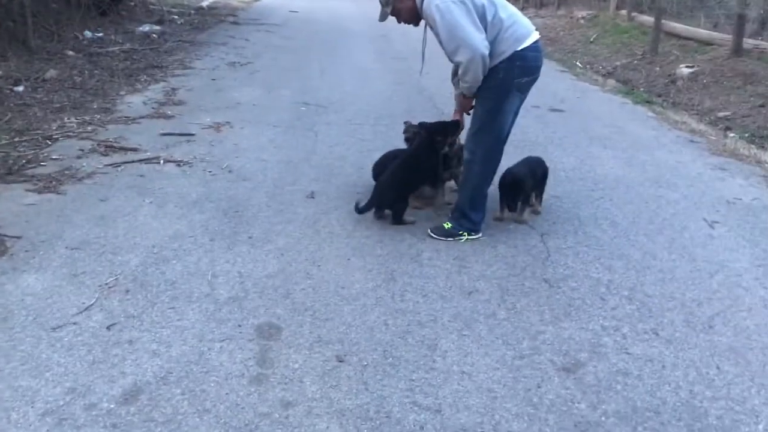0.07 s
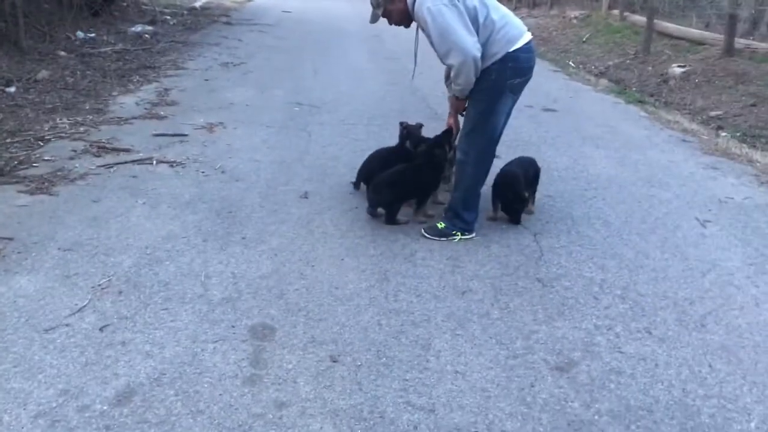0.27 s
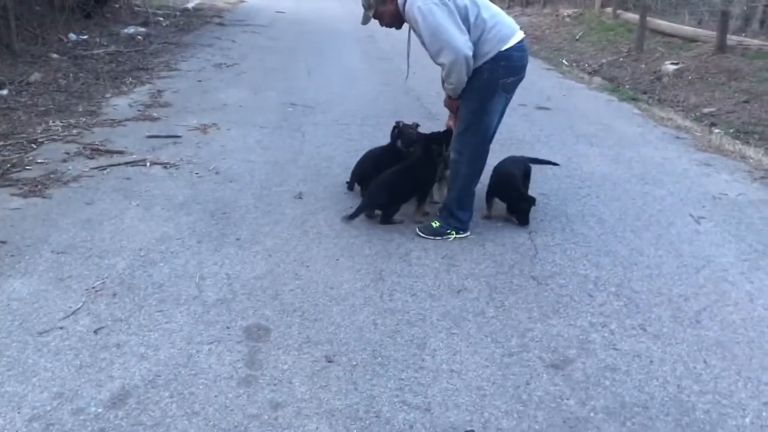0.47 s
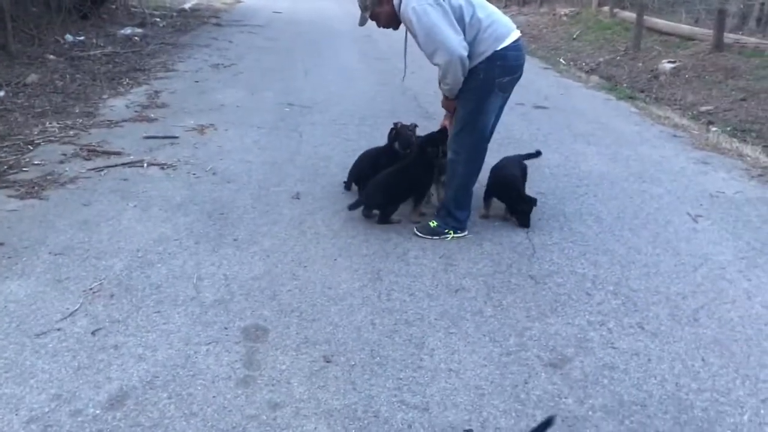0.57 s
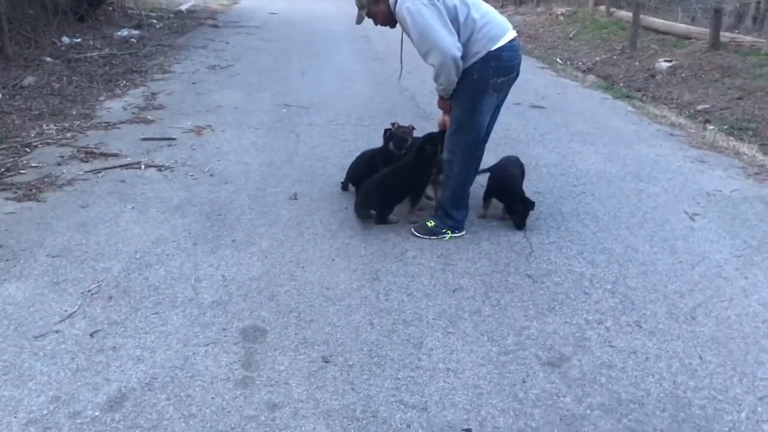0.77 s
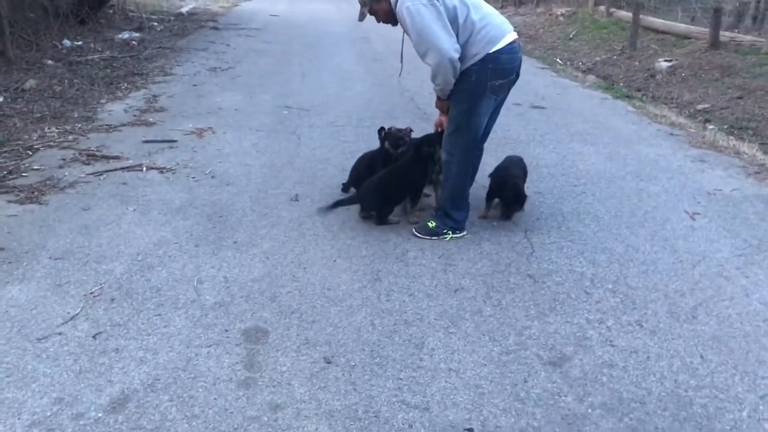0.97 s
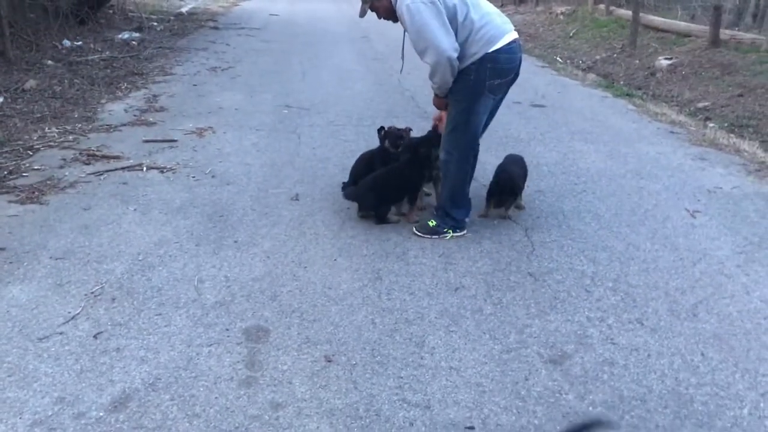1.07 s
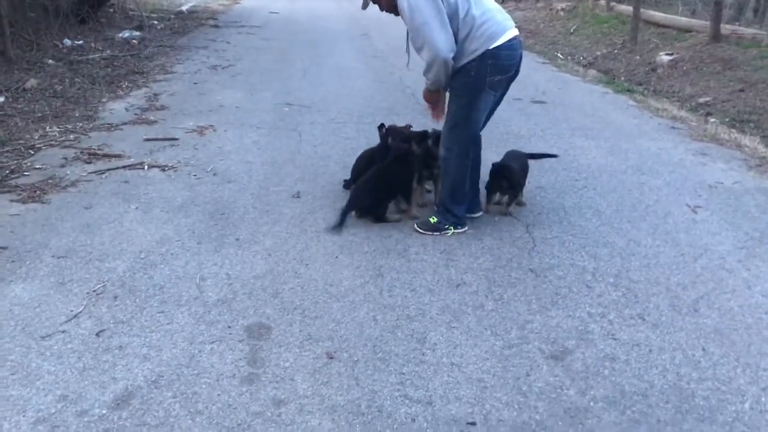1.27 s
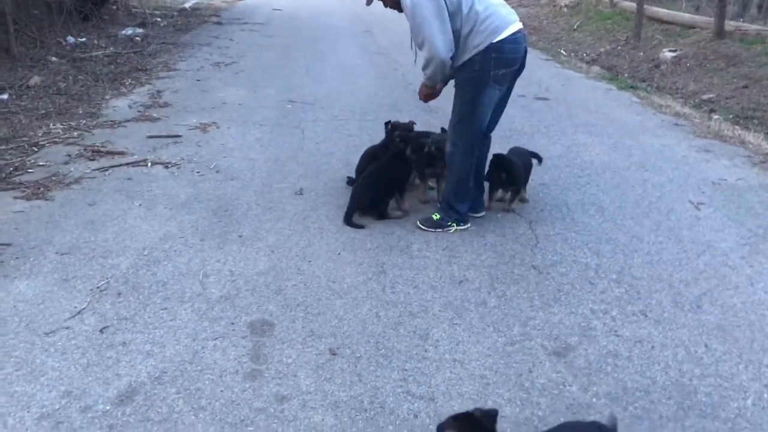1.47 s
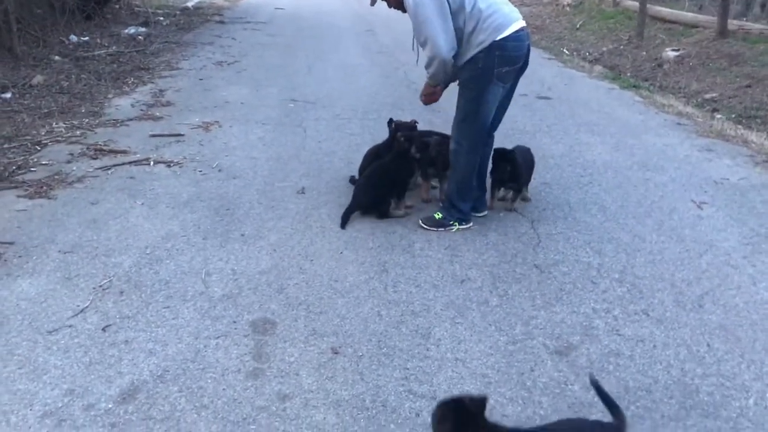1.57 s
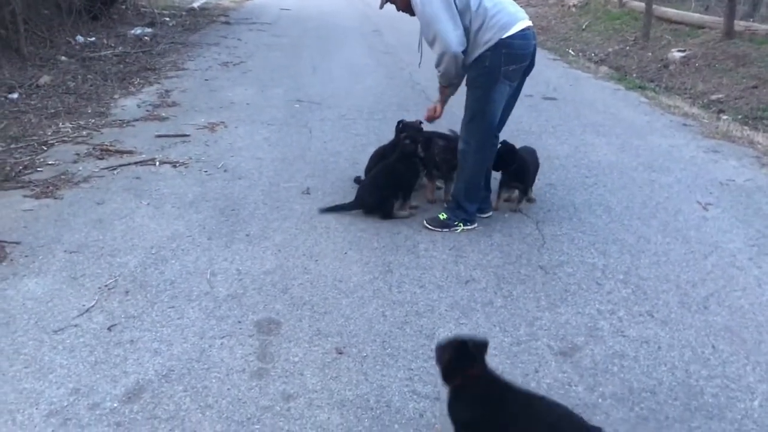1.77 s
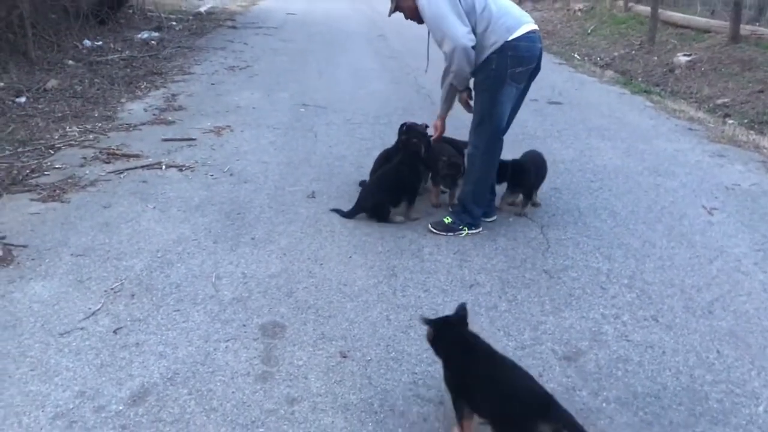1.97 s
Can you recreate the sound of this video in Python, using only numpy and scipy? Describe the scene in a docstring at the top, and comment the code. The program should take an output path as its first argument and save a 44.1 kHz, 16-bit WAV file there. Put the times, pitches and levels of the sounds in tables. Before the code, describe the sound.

Short, high puppy calls come one after another on a country road: a yelp, two hoarse yips, then three cleaner ones. Each echoes slightly, while faint claw ticks and soft open-air hiss lie underneath.

```python
"""A puppy's whining yelp comes first, then five short begging yips that rise and fall in pitch.
Each call is the buzz of the vocal folds, shaped by the throat and mouth. The yelp and the first two
yips break into a rasp, and air rushes through those two yips, most strongly the second.
Claws tick on the asphalt of a country road, the roadside bank and trees send back a dull echo,
and a faint outdoor rumble and hiss lie under it all."""
import sys
import numpy as np
from scipy import signal
from scipy.fft import rfft, irfft, next_fast_len
from scipy.io import wavfile
from scipy.ndimage import uniform_filter1d

SR = 44100
rng = np.random.default_rng(int(sys.argv[2]) if len(sys.argv) > 2 else 0)


def to_wav(sig):
    """Store sig (one row per channel, or 1-D mono) as 16-bit WAV at the path in sys.argv[1].

    Samples outside -1..1 are clipped; the rate is SR.
    """
    pcm = np.clip(np.atleast_2d(sig), -1, 1) * 32767
    pcm = np.round(pcm).astype(np.int16)
    wavfile.write(sys.argv[1], SR, pcm.T)  # frames by channels


N = 88993
TIME = np.arange(N) / SR


def from_db(db):
    """Turn decibels into a gain to multiply by."""
    return 10 ** (np.asarray(db) / 20)


def rms_one(x):
    """Scale a signal so that its average strength (rms) is 1."""
    return x / np.sqrt(np.mean(x ** 2) + 1e-20)


def gain_at(spectrum, hz):
    """Look up the gain at these frequencies in a table of f/Hz, level/dB."""
    table_hz, db = np.transpose(spectrum)
    return from_db(np.interp(np.log(np.maximum(hz, 1)), np.log(table_hz), db))


def colour(x, spectrum):
    """Turn each frequency of a sound up or down as the table says."""
    size = next_fast_len(2 * len(x))
    gains = gain_at(spectrum, np.fft.rfftfreq(size, 1 / SR))
    return irfft(rfft(x, size) * gains, size)[:len(x)]


def noise(spectrum):
    """Noise of strength 1, coloured by the table."""
    return rms_one(colour(rng.standard_normal(N), spectrum))


def drift(hz):
    """A random wobble of strength 1, mostly slower than this rate."""
    lowpass = signal.butter(2, hz, fs=SR, output="sos")
    return rms_one(signal.sosfilt(lowpass, rng.standard_normal(2 * N))[N:])


def resonate(x, hz, width_hz):
    """Make a sound ring at one frequency; a narrower width rings longer."""
    r = np.exp(-np.pi * width_hz / SR)
    feedback = [1, -2 * r * np.cos(2 * np.pi * hz / SR), r * r]
    return signal.lfilter(np.array([1, 0, -1]) * (1 - r * r) / 2, feedback, x + 1e-18)


def delayed(x, seconds):
    """The same sound, later."""
    return np.interp(TIME - seconds, TIME, x, left=0)


def swell(peak_s, rise_s, hold_s, fall_s, db):
    """A gain that climbs 20 dB per rise time, holds from peak_s, then drops 20 dB per fall time."""
    rises_to_go = np.maximum(peak_s - TIME, 0) / rise_s
    falls_done = np.maximum(TIME - peak_s - hold_s, 0) / fall_s
    return from_db(db - 20 * (rises_to_go + falls_done))


def glide(rows):
    """Pitch and gain sliding through rows of t/s, f/Hz, level/dB; silent before and after."""
    times, hz, db = np.transpose(rows)
    sounding = (TIME >= times[0]) & (TIME < times[-1])
    return np.interp(TIME, times, hz), from_db(np.interp(TIME, times, db)) * sounding


def open_air(level_db=-46):
    """The steady, faint rumble and hiss of the outdoors."""
    # colour of the background: f/Hz, relative level/dB
    spectrum = [(22, -23), (45, -2.5), (62, -1.5), (100, -5), (160, -7), (260, -16.5), (420, -15),
                (850, -13), (1400, -17.5), (2000, -23), (3000, -35.5), (5000, -45), (8000, -51),
                (10500, -54.5), (15000, -43.5)]
    return from_db(level_db) * noise(spectrum)


def roadside_echo(x, bank_delay_s=0.064, build_s=0.025, fade_60db_s=0.85):
    """The bank sends back one echo; the trees scatter many small ones that die away."""
    # how bank and trees colour what they send back: f/Hz, gain/dB
    echo_colour = [(250, 12), (470, -12.5), (700, -1), (930, 7.5), (1400, 2.5), (1750, 8), (2600, -1),
                   (4500, -0.5), (7000, -3), (14000, -43)]
    scatter = rng.standard_normal(N) * from_db(-60 * TIME / fade_60db_s)
    scatter *= 1 - np.exp(-TIME / build_s)
    trees = signal.fftconvolve(x, scatter / np.sqrt(np.sum(scatter ** 2)))[:N]
    bank = delayed(x, bank_delay_s)
    return colour(from_db(-12.5) * trees + from_db(-15) * bank, echo_colour)


def claws(decay_s=0.0028, grit_per_s=67, grit_db=-62.5, grit_spread_db=8.5, grit_hz=13800):
    """Claws scratch the asphalt and grit crunches under the paws: tiny ringing bursts of noise."""
    # ticks on the asphalt: t/s, level/dB, ring f/Hz
    ticks = [(.223, -46, 13700), (0.249, -55.5, 13300), (0.356, -54.5, 13500), (0.422, -51, 4100),
             (.424, -59, 12100), (0.94, -57, 11600), (0.962, -54.5, 5160), (1.716, -57.5, 4040)]
    draws = rng.random((int(grit_per_s * N / SR), 2))
    grit = [(when * N / SR, grit_db - grit_spread_db * softness, grit_hz) for when, softness in draws]
    scratch, out = rng.standard_normal(N), np.zeros(N)
    for start_s, db, hz in ticks + grit:
        start = int(start_s * SR)
        burst = scratch[start:start + 1500]
        fade = np.exp(-TIME[:len(burst)] / decay_s)
        width_hz = 0.24 * hz
        ring = resonate(burst * fade, hz, width_hz)
        boost = np.sqrt(SR / (np.pi * width_hz))  # a narrow ring lets less noise through
        out[start:start + len(burst)] += from_db(db) * ring * boost
    return out


def air_rushes(bounce_s=0.0036, bounce_gain=0.92):
    """The hiss of a hoarse yip; its bounce off the road cancels evenly spaced frequencies."""
    # rushes of air through the mouth: peak t/s, rise/s, hold/s, fall/s, level/dB
    rushes = [(.315, .06, 0.024, 0.1, -64), (.635, 0.062, 0.11, 0.066, -48)]
    # colour of the rushing air: f/Hz, relative level/dB
    spectrum = [(800, -22), (1700, -3.5), (2600, -7.5), (3600, -7.5), (4500, -3.5), (6000, -10.5),
                (7600, -18.5), (10500, -14.5), (13000, -13), (14500, -7), (16000, -18)]
    air = noise(spectrum)
    gain = sum(swell(*rush) for rush in rushes)
    return gain * rms_one(air + bounce_gain * delayed(air, bounce_s))


def rasps():
    """The voice breaks: the vocal folds flutter chaotically and make the throat ring."""
    # each rasp: peak t/s, rise/s, hold/s, fall/s, level/dB, gain of the upper rings/dB
    breaks = [(0.032, 0.037, 0.027, 0.095, -38.5, 10), (0.273, 0.072, 0.039, 0.085, -31, -0.5),
              (0.66, 0.049, 0.051, .05, -30, 0.5)]
    # where the rasping throat rings: f/Hz, width/Hz, relative level/dB
    throat = [(525, 32.6, 5), (704, 154, -6), (1000, 330, -14.5), (1354, 146, -11), (1652, 69, -10),
              (2460, 280, -26), (4250, 510, -34.5)]
    flutter_band = signal.butter(2, [400, 6000], "band", fs=SR, output="sos")
    flutter = signal.sosfilt(flutter_band, rng.standard_normal(N))
    # alternating signs keep neighbouring rings from cancelling in the gap between them
    rings = [(-1) ** k * from_db(db) * resonate(flutter, hz, width_hz)
             for k, (hz, width_hz, db) in enumerate(throat)]
    out = np.zeros(N)
    for *shape, upper_db in breaks:
        rasp = sum(rings[:2]) + from_db(upper_db) * sum(rings[2:])
        strength = np.sqrt(uniform_filter1d(rasp * rasp, size=600) + 1e-12)
        out += swell(*shape) * rasp / strength  # evened out, so the swell sets the level
    return out


def voice(pitch, throat, roughness, overtone_gain):
    """The vocal folds buzz and the throat shapes the harmonics; roughness shakes pitch and level."""
    pitch_shake = 1 + 0.0928 * roughness * drift(hz=106.3)
    level_shake = 1 + 0.94 * roughness * drift(hz=126)
    phase = 2 * np.pi * np.cumsum(pitch * pitch_shake) / SR
    harmonics = [gain_at(throat, k * pitch) * np.sin(k * phase) for k in range(1, 21)]
    return (harmonics[0] + overtone_gain * sum(harmonics[1:])) * level_shake


def yelp():
    """A whine that rings on its second harmonic; a thin squeal splits off as it breaks."""
    # path of the whine: t/s, pitch f/Hz, level before the throat/dB
    whine_path = [(0, 411.7, -30.5), (0.017, 440.5, -28.5), (0.037, 465.5, -27), (0.049, 454.3, -40),
                  (0.064, 435, -39), (0.088, 393, -42), (.12, 404, -69)]
    # the throat with the mouth more open than in a yip: f/Hz, gain/dB
    throat = [(400, -22.5), (600, -12), (880, 1.5), (1340, -13.5), (1780, -7.5), (2250, -20.5),
              (2750, -23.5), (3600, -43), (4400, -24.5), (5300, -56), (6300, -34), (7300, -70)]
    # path of the squeal: t/s, pitch f/Hz, level/dB
    squeal_path = [(.025, 954, -67.5), (.04, 994, -33.5), (.06, 1083, -36), (.08, 1120, -66)]
    pitch, gain = glide(whine_path)
    whine = gain * voice(pitch, throat, roughness=0.12, overtone_gain=0.9)
    squeal_pitch, squeal_gain = glide(squeal_path)
    squeal = squeal_gain * np.sin(2 * np.pi * np.cumsum(squeal_pitch) / SR)
    return whine + squeal


def yips():
    """Five breathy yips share one arch of pitch and effort; the closing mouth dulls each at its end."""
    # each yip: start t/s, length/s, top pitch f/Hz, base level/dB, roughness/0-1, overtone gain/dB
    calls = [(0.164, .205, 476, -32, .12, 2), (.585, 0.18, 515, -37, 0.61, -2),
             (1.071, 0.16, 468, -30.5, 0.13, -2), (1.359, .167, 470, -31, 0.11, -0.5),
             (1.809, 0.18, 473, -31, .08, 1.5)]
    # the arch: share of the length, share of the top pitch, added level/dB, added overtone gain/dB
    arch = [(0, .53, -30, 2), (0.149, .6, -20.5, 0.5), (0.251, .68, -8, 0), (.35, .778, -1.5, -0.5),
            (0.431, .86, -2, 4), (0.468, 0.96, -2.5, 5), (0.598, 1, 4, 1.5), (0.719, 0.97, 2, -7),
            (0.802, .89, 3, -14), (0.879, .77, -12, -18), (1.002, 0.58, -24, -14)]
    # how throat and muzzle shape a yip: f/Hz, gain/dB
    throat = [(250, -1.5), (370, -8.5), (470, 0), (620, 1.5), (780, -1.5), (930, -14), (1100, -9.5),
              (1240, -18.5), (1410, -7.5), (1560, -32.5), (1950, -19.5), (2300, -34.5), (3300, -39),
              (4800, -49), (6500, -41), (8000, -60)]
    # air hissing at the teeth: f/Hz, relative level/dB
    teeth_spectrum = [(1500, -14), (2500, -0.5), (4200, -9.5), (5300, -8), (6200, 5), (6900, -2),
                      (7700, -29.5), (11000, -39.5)]
    # breath slipping past the vocal folds: f/Hz, relative level/dB
    breath_spectrum = [(250, -37), (400, 1), (650, 0), (1000, -7.5), (1500, -12.5), (1950, -12.5),
                       (2400, -23), (4000, -40.5)]
    share, bend, effort_db, mouth_db = np.transpose(arch)
    pitch, gain, roughness, overtone_gain = np.ones(N), np.zeros(N), np.zeros(N), np.zeros(N)
    for start_s, length_s, top_hz, db, call_roughness, overtone_db in calls:
        progress = (TIME - start_s) / length_s
        on = (progress >= 0) & (progress <= 1)
        pitch[on] = top_hz * np.interp(progress[on], share, bend)
        gain[on] = from_db(db + np.interp(progress[on], share, effort_db))
        overtone_gain[on] = from_db(overtone_db + np.interp(progress[on], share, mouth_db))
        roughness[on] = call_roughness
    teeth = from_db(-30) * noise(teeth_spectrum) * np.sqrt(overtone_gain)
    breath = from_db(-15.5) * noise(breath_spectrum)
    return gain * (voice(pitch, throat, roughness, overtone_gain) + teeth + breath)


def scene():
    """The puppies' calls, their echo, the open air and the claws, in one channel."""
    puppies = yelp() + yips() + rasps() + air_rushes()
    return (puppies + roadside_echo(puppies) + open_air() + claws())[None]


def record(dry):
    """A steep filter cuts off the very highest treble."""
    cutoff_hz = 15850
    return signal.sosfilt(signal.ellip(12, .1, 80, cutoff_hz, fs=SR, output="sos"), dry)


dry = scene()
out = record(dry)
to_wav(out)
```